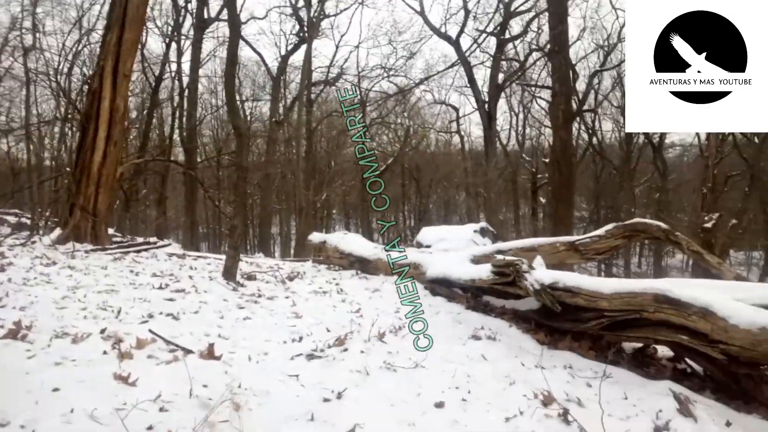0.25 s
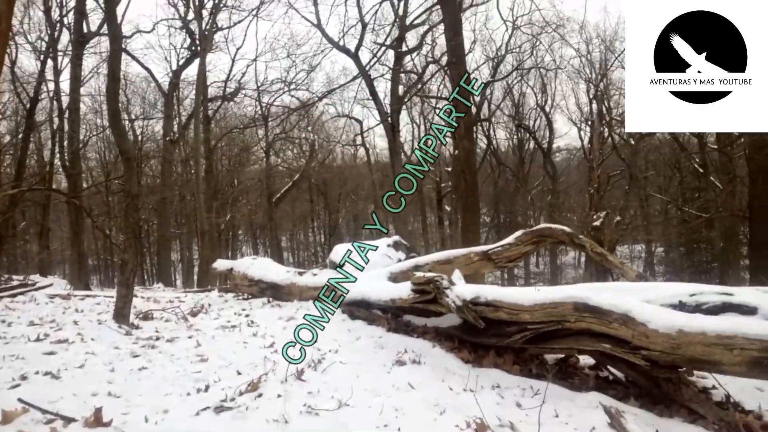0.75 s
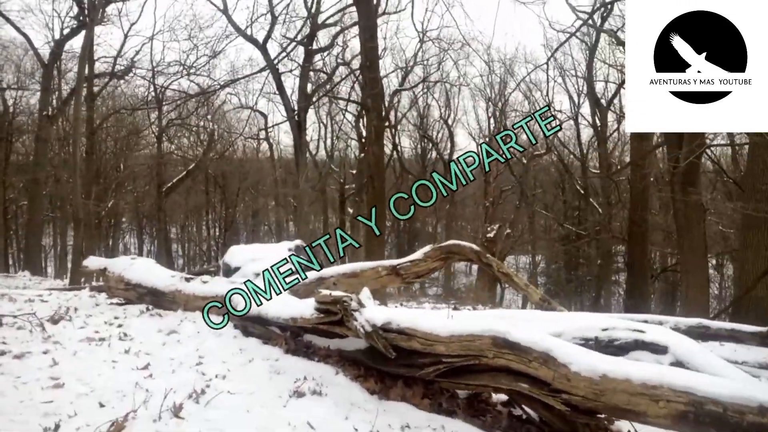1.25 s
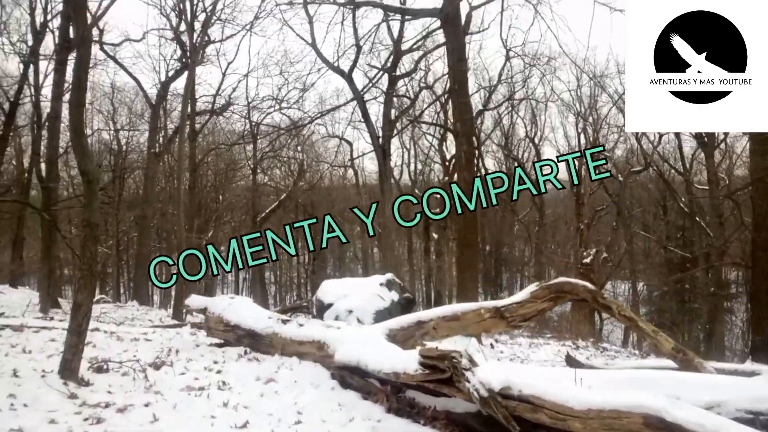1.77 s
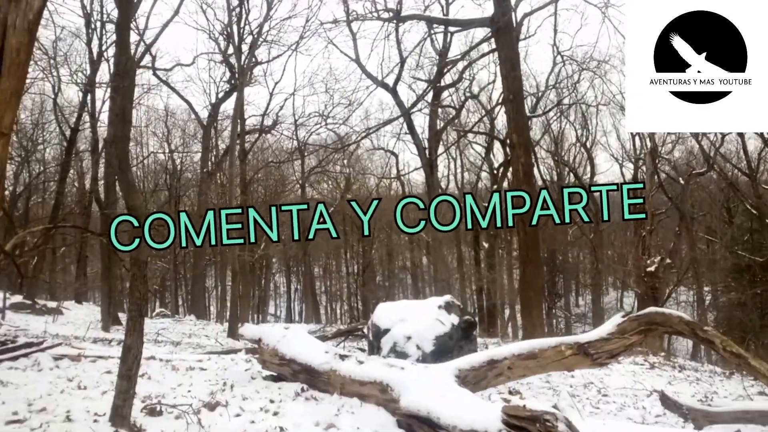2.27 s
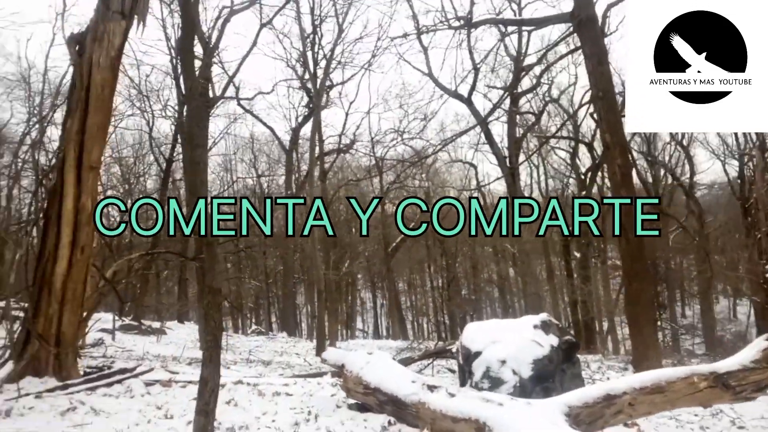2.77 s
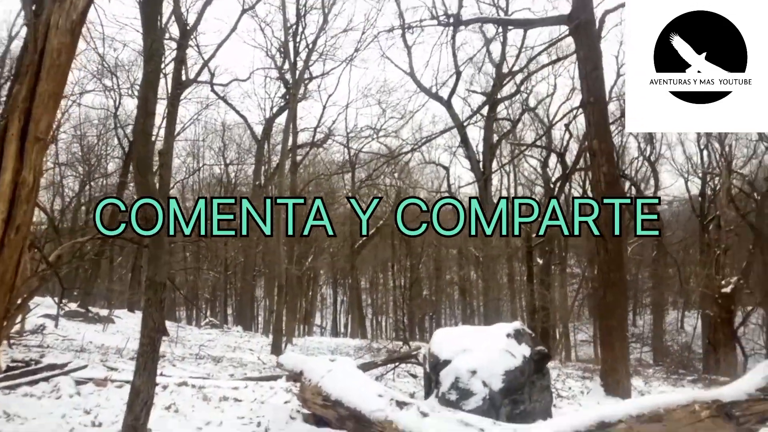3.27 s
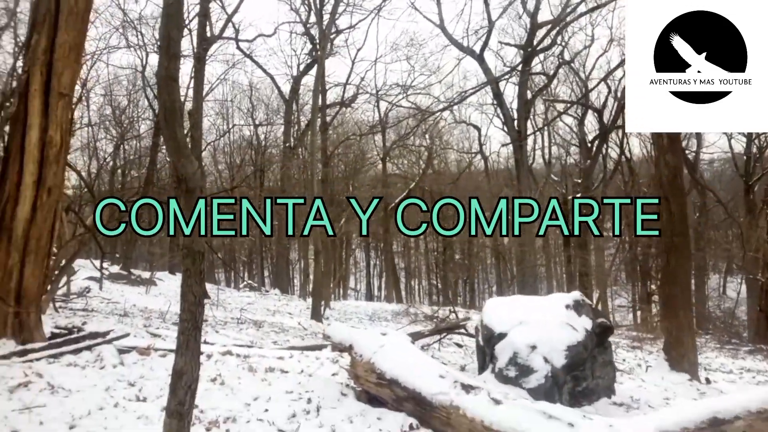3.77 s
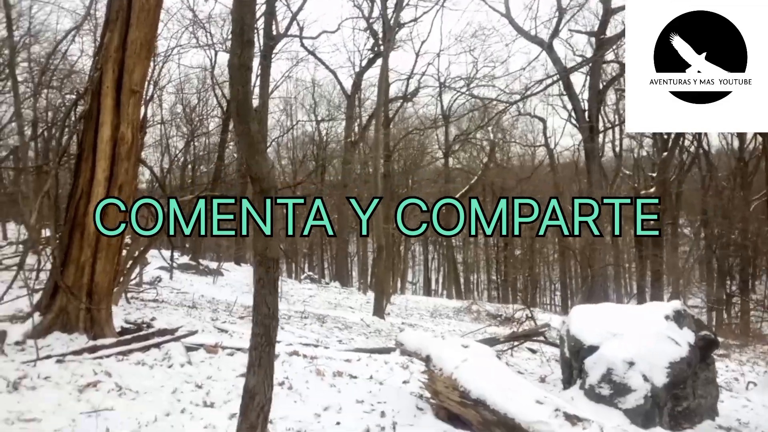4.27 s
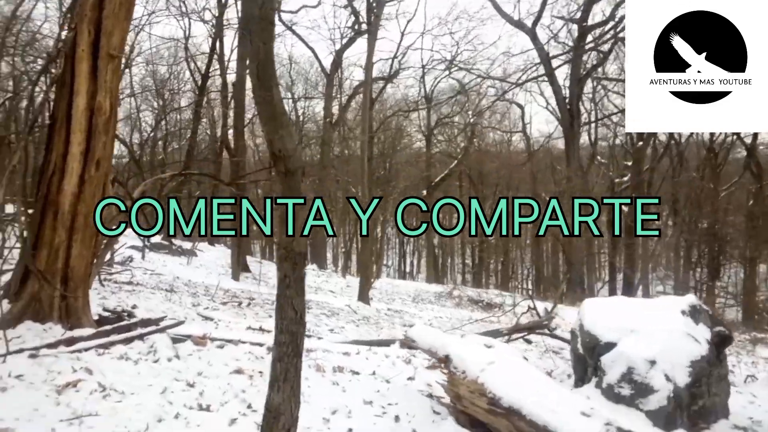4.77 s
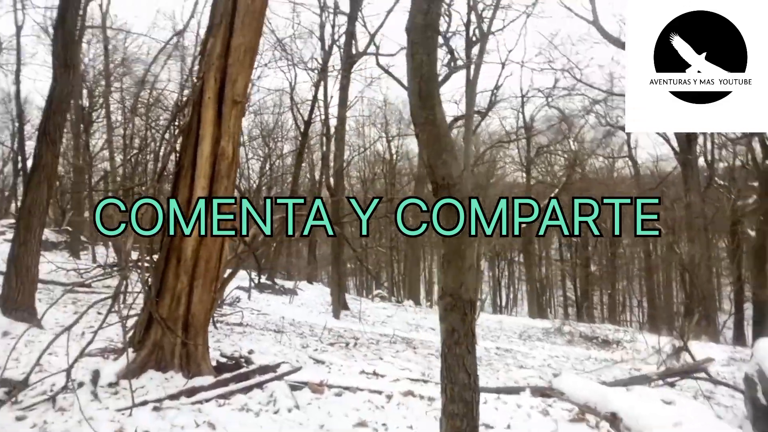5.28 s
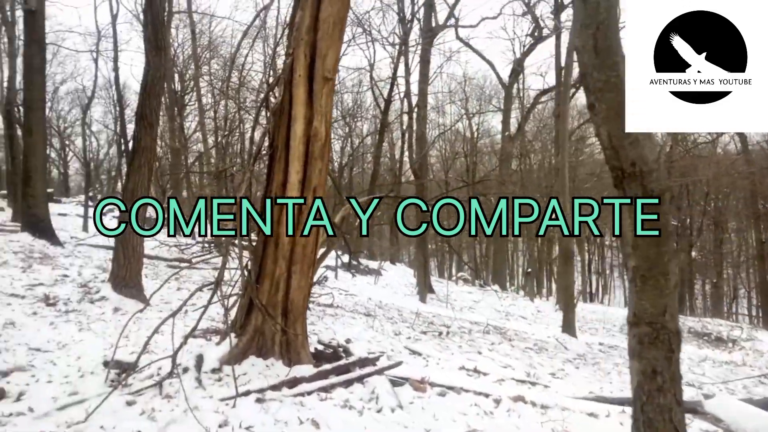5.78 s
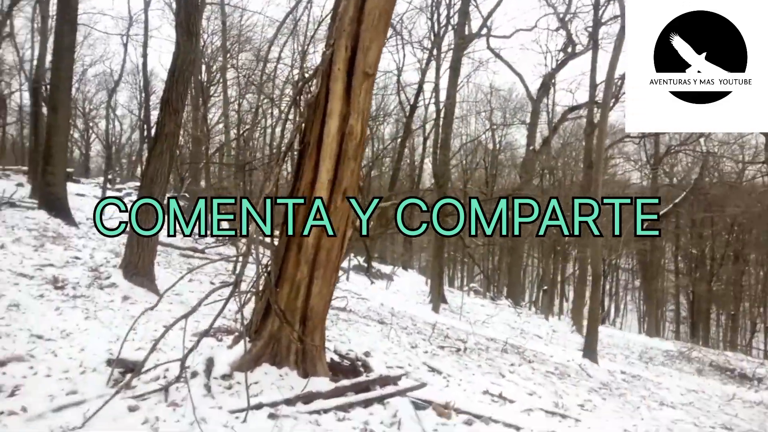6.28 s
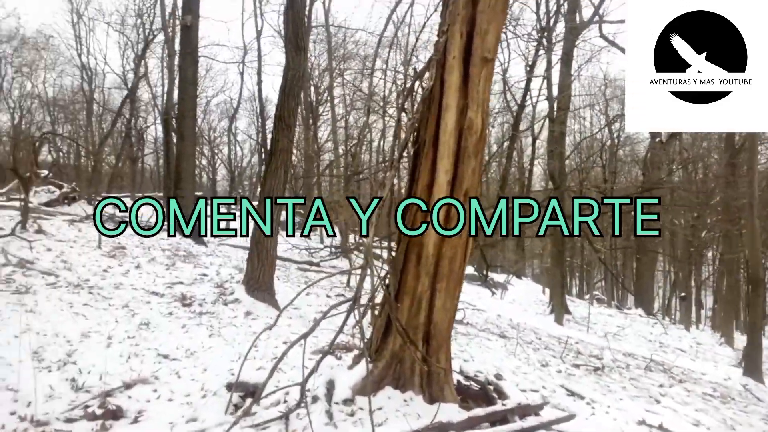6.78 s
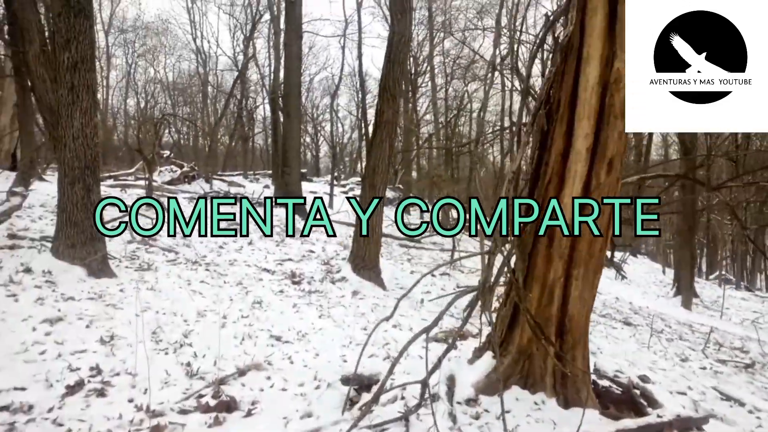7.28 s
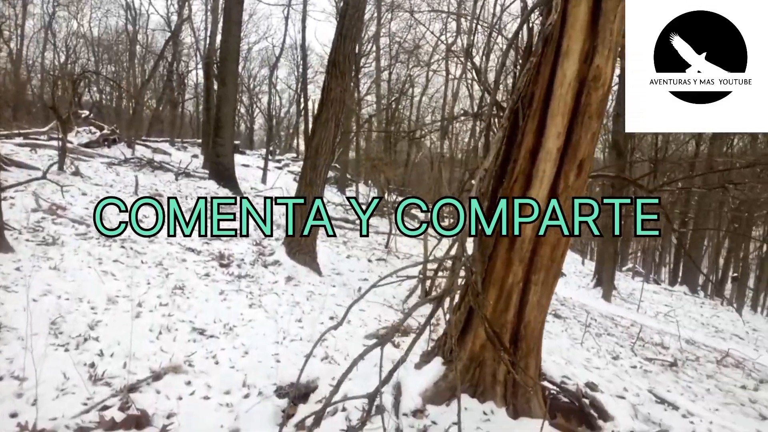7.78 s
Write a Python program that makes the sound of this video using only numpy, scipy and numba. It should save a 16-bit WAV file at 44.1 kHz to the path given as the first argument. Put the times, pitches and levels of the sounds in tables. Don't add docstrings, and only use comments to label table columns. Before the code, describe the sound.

A walker crosses crusted snow in a still, bare forest, holding the microphone in the hand. About every seven tenths of a second a boot bites, cracking the icy crust in a dense crackle, with crumbs hissing above and a dull crunch below. Small ticks and scuffs fill the gaps. The early steps are uneven, the later ones fuller and brighter. Soft grip rumble and faint air lie underneath.

```python
import sys
import numpy as np
from scipy import signal
from scipy.io import wavfile
from scipy.ndimage import uniform_filter1d, map_coordinates
from numba import njit

SR = 44100
rng = np.random.default_rng(int(sys.argv[2]) if len(sys.argv) > 2 else 0)


def volts_from_decibels(level):
    exponent = np.asarray(level, float) / 20
    return 10 ** exponent


def put_to_file(sound):
    columns = np.atleast_2d(sound).T
    safe = np.clip(columns, -1, 1)
    whole_steps = np.round(safe * 32767)
    wavfile.write(sys.argv[1], SR, whole_steps.astype(np.int16))


N = 354652

# [t/s of full bite, level/dB, rise/s, sinking/s, time until lift/s]
HEELS = [(0.0, -41, .012, .05, .23), (0.644, -34, .008, .04, .41), (1.659, -41, .01, .04, .25),
         (2.434, -45, .014, .165, .17), (3.064, -41, .025, .05, .265), (3.682, -27, .018, .03, .32),
         (4.398, -31, .022, .03, .39), (5.056, -26.5, .006, .065, .31), (5.836, -28, .018, .03, .36),
         (6.488, -39, .012, .06, .35), (7.214, -28, .012, .04, .335), (7.925, -26, .04, .05, .3)]
# [t/s, level/dB, rise/s, sinking/s, fall/s]
ROLLS = [(0.168, -36, 2.5, .004, -0.1648), (0.798, -21, 0.1478, .022, -0.0369),
         (0.898, -37, -0.0793, 0.043, 0.3518), (1.702, -37.5, 0.0734, 0.024, 0.1173),
         (2.504, -35.5, 0.1368, .01, 0.1095), (3.157, -28.5, 0.1859, .02, 0.1135),
         (3.265, -37.5, 0.5384, 0.008, -1.2518), (3.77, -26.5, -0.047, 0.13522, 0.1064),
         (4.432, -24, 0.2027, .01, 0.3035), (4.705, -43, 0.0581, .01, 0.0156),
         (5.19, -29.5, .5, 0.07723, 0.1412), (5.885, -23.5, 0.1807, .005, 0.0655),
         (5.968, -34.5, 0.4913, .15, 0.3408), (6.603, -24.5, 0.1787, 0.12568, 0.1726),
         (7.29, -26, 0.2683, .13, 0.2228), (8.02, -24.5, 0.4375, .03, 0.5448)]
# [t/s, level/dB, rise/s, dragging/s]
SCUFFS = [(0.306, -55, .01, .015), (0.53, -59, .015, .105), (0.645, -30, .004, .008),
          (0.788, -25, .004, .004), (0.803, -24, .004, .004), (1.095, -51, .04, .07),
          (1.27, -53, .012, .02), (1.5, -54, .008, .02), (1.545, -55, .008, .02), (1.58, -57, .008, .035),
          (1.77, -57, .03, .11), (2.28, -66, .05, .11), (2.66, -65, .02, .04), (2.94, -62, .02, .05),
          (3.03, -57, .03, .015), (3.465, -59, .02, .04), (3.645, -54, .05, .03), (4.258, -52, .012, .04),
          (4.314, -48, .02, .06), (4.66, -44, .03, .012), (4.698, -42, .012, .012),
          (4.862, -39, .015, .006), (4.98, -53, .025, .07), (5.58, -63, .01, .07), (5.665, -48, .006, .02),
          (5.705, -50, .006, .04), (5.77, -55, .05, .05), (6.335, -58, .02, .015), (6.38, -58, .03, .1),
          (7.035, -56, .025, .06), (7.11, -54, .04, .09), (7.8, -65, .03, .06), (7.864, -45, .012, .04)]
# [t/s, level/dB, rise/s, packing/s, fall/s]
SINKS = [(0.0, -48, .11, 0.1083, 0.6031), (0.792, -29, 0.0797, 0.01118, 0.0978),
         (1.712, -32.5, 0.1745, 0.008375, 0.0876), (2.436, -36, -0.0033, .06, 0.1278),
         (2.51, -30.5, 0.1705, 0.00728, 0.1338), (3.075, -36.5, 0.2971, 0.02804, 0.0559),
         (3.135, -34, 0.1138, 0.1622, 0.092), (3.698, -29.5, 0.0291, 0.12087, 0.2078),
         (4.442, -30, 0.1664, 0.01833, 0.0758), (5.06, -29, 0.0084, 0.2385, -0.0163),
         (5.855, -30, 0.053, 0.04216, 0.1513), (6.49, -42, 0.0221, 0.0495, 0.0678),
         (6.599, -31, 0.239, 0.17488, -0.06), (7.21, -29.5, 0.0706, 0.18494, 0.0413),
         (7.946, -28, 0.1332, 0.004246, -0.0545), (8.042, -28, 0.2428, .01, 1.4927)]
# [t/s, share of loose crumbs, level/dB, brightness of the crust, level/dB]
GROUND = [(0.1, -5.5, -2.5), (0.65, 4, 5.5), (0.8, -6, -3), (0.95, -12, -3), (1.1, -17.5, -1), (1.7, -9, 0),
          (2.5, -13.5, -6), (3.08, -10, -2.5), (3.25, -13, -0.5), (3.7, -12, 0.5), (3.9, -14, 1.5),
          (4.42, -9, 4.5), (4.7, -9, 3), (5.07, -15, -0.5), (5.2, -13, 2), (5.35, -14, 4), (5.6, -8, 8),
          (5.9, -6.5, 4.5), (6.1, -6.5, 4), (6.3, -8, -3.5), (6.55, -9.5, 1.5), (6.8, -10, 5.5),
          (7.22, -7.5, 5.5), (7.35, -11, 8.5), (7.5, -11, 5.5), (7.95, -10.5, 1.5)]
# [t/s, level/dB]
DEPTH = [(0.1, -3.5), (0.8, -0.5), (1.7, 1), (2.5, 0), (3.1, -1.5), (3.25, 0.5), (3.7, 1), (3.9, 4),
         (4.42, 3), (4.5, 7), (5.06, 1.5), (5.25, -0.5), (5.85, 1.5), (6.5, 0.5), (6.7, 2), (7.22, 1),
         (7.38, 3), (7.95, -1.5)]
# [f/Hz, level/dB]
CRUST_COLOUR = [(1050, -15), (1250, 7.5), (1500, 9), (2000, 2.5), (2900, 6.5), (3600, -0.5), (4200, -21)]
CRUMB_COLOUR = [(3600, 9.5), (4500, 10), (5500, -10.5), (6500, -1.5), (7500, 11)]
PACKING_COLOUR = [(105, -15.5), (200, -7), (330, 3.5), (500, -1.5), (750, 4), (1150, 5.5)]
# [t/s, peak level/dB, ring f/Hz, decay/s]
SNAPS = [(0.626, -19, 1375, 0.047), (0.6426, -12.5, 1265, 0.072), (0.734, -10.5, 2840, .035),
         (0.7531, -23, 1440, .035), (0.8734, -20, 1400, .028), (0.8998, -14.5, 1450, 0.012),
         (1.657, -38.5, 1914, 0.035), (1.6751, -16, 2668, 0.08), (2.441, -28.5, 1147, 0.11),
         (2.4632, -19.5, 1039, 0.024), (3.0642, -25.5, 1316, 0.023), (3.149, -10.5, 2568, 0.03),
         (3.262, -14.5, 1798, 0.00996), (3.678, -11.5, 1173, 0.0077), (3.6872, -9, 1257, 0.14),
         (4.3964, -10.5, 1432, 0.17), (4.4181, -14, 1720, 0.015), (4.5983, -17.5, 1438, 0.044),
         (4.6528, -19, 1557, 0.036), (4.693, -18, 1839, 0.024), (5.0973, -19.5, 1915, 0.034),
         (5.973, -11, 1255, 0.038), (6.0502, -20.5, 2969, 0.025), (6.4858, -30.5, 2594, 0.036),
         (6.5654, -19, 2130, 0.057), (7.1703, -21, 2785, 0.029), (7.4224, -21, 1384, 0.074),
         (7.863, -15, 3124, 0.0858), (7.9262, -4.5, 2662, 0.078)]
# [t/s, peak level/dB, ring f/Hz, fine spray level/dB, decay/s]
TICKS = [(0.2531, -52.5, 2043, -13, 0.0642), (0.3038, -38.5, 1712, -1.5, 0.05233),
         (0.3493, -51, 1319, -9, 0.0504), (0.3797, -57.5, 2502, -8.5, 0.055),
         (0.4177, -45, 2312, -6.5, 0.06996), (0.5245, -36.5, 2902, -12, 0.0651),
         (0.5362, -34.5, 1125, -10, 0.0731), (0.586, -36.5, 1259, -10, 0.086),
         (1.0958, -37.5, 1574, -13.5, 0.0653), (1.1481, -35.5, 3217, -14.5, 0.05954),
         (1.274, -40, 1403, -9, 0.0558), (1.42, -43, 2304, -10, 0.0741), (1.5023, -38, 2860, -14.5, 0.06),
         (1.5465, -38, 1924, -10.5, 0.06), (1.5766, -41.5, 2959, -11.5, 0.0762),
         (2.7243, -44, 1130, -10, 0.04834), (2.8991, -41.5, 1193, -15, 0.0614),
         (2.9356, -44, 1605, -10.5, 0.0618), (3.3024, -39.5, 1534, -10, 0.0463),
         (3.3204, -44.5, 1637, -12.5, 0.0509), (3.3942, -45.5, 1436, -17, 0.04366),
         (3.4599, -47, 1658, -12.5, 0.0492), (3.486, -40, 1909, -9, 0.07363),
         (3.5636, -35.5, 1731, -21.5, 0.0692), (3.6163, -45, 1157, -10, 0.04446),
         (4.2588, -41.5, 2488, -13.5, 0.0457), (4.31, -34.5, 1452, -14.5, 0.06394),
         (4.8553, -41, 1706, -6.5, 0.04344), (5.0011, -41.5, 2026, -13, 0.041),
         (5.0237, -40.5, 1653, -17, 0.07204), (5.4175, -58.5, 1115, -7, 0.05715),
         (5.453, -53, 3809, -8.5, 0.0498), (5.5758, -58, 3230, -9.5, 0.0411),
         (5.6668, -37.5, 2812, -13.5, 0.04427), (5.7043, -35, 1484, -15.5, 0.071),
         (6.163, -35.5, 2444, -7, 0.081), (6.3179, -45, 1380, -13, 0.0647),
         (6.9409, -55, 3258, -11, 0.0464), (6.9674, -54.5, 4425, -13.5, 0.0505),
         (7.1151, -31.5, 1715, -13, 0.04402)]
# [t/s, peak level/dB, ring f/Hz, cycles until 60 dB down]
CRACKS = [(0.094, -24, 2640, 13.5), (0.174, -20.5, 1220, 23), (0.643, -20.5, 1260, 3.5),
          (0.785, -23, 1100, 12), (0.786, -10.5, 1170, 13), (0.801, -11, 1940, 12.5),
          (0.872, -27, 1430, 12.5), (0.928, -25.5, 1500, 17), (1.655, -31.5, 1950, 10),
          (2.493, -29, 1360, 11.5), (3.262, -22.5, 1820, 11.5), (3.564, -29.5, 1730, 14),
          (3.704, -13, 1190, 15.5), (3.766, -12.5, 1530, 5.5), (4.056, -52.5, 2830, 13.5),
          (4.097, -60, 1160, 11.5), (4.396, -19.5, 1370, 8), (4.437, -17.5, 1700, 13),
          (4.584, -24.5, 1820, 18), (4.713, -28, 1720, 18.5), (5.023, -34, 2150, 18.5),
          (5.053, -18, 1630, 13.5), (5.097, -22, 1930, 14), (5.142, -13.5, 2690, 13),
          (5.194, -24, 1280, 10), (5.836, -20.5, 2900, 8), (5.876, -14, 1440, 12), (6.506, -29, 1700, 10.5),
          (6.595, -13.5, 3100, 10), (6.737, -19, 1320, 10.5), (7.17, -29.5, 2700, 14),
          (7.216, -20, 2220, 10.5), (7.24, -14.5, 1650, 10), (7.291, -17, 2610, 14),
          (7.337, -21.5, 1790, 9.5), (7.915, -19.5, 1820, 5.5), (7.993, -18, 2400, 12.5),
          (8.004, -9.5, 1650, 10)]
# [t/s, peak level/dB, ring f/Hz]
SLABS = [(0.762, -26.5, 448.4), (0.784, -17.5, 373.8), (1.684, -26, 755.3), (2.44, -37, 538.6),
         (2.497, -21, 703), (3.08, -24, 421), (3.133, -22, 353.3), (3.675, -19, 789), (4.394, -23, 771),
         (4.43, -25, 221.6), (5.063, -17, 697.5), (5.831, -45.5, 862.8), (6.49, -30, 313.3),
         (6.571, -35, 343), (7.209, -22, 391.4), (7.921, -19, 715)]
# [t/s, level/dB]
TRICKLE = [
    (0.3, -68),
    (1.5, -68),
    (2.1, -76),
    (3.4, -81.5),
    (4.1, -77),
    (5.5, -74.5),
    (7.0, -68.5),
    (7.7, -70.5),
]
# [f/Hz, level/dB]
TRICKLE_COLOUR = [(1500, 2), (3500, -2.5), (7000, -10)]
# [t/s, level/dB]
ECHOES = [
    (0.009, -35.5),
    (.029, -20.5),
]
# [t/s, level/dB, rise/s, shaking/s]
JOLTS = [(0.03, -53, 1.3746, 0.02582), (0.297, -55.5, -0.0513, 0.07852), (0.527, -40, -0.0974, 0.10714),
         (0.76, -52, 0.8325, 0.13765), (1.08, -51, 0.1507, 0.1031), (1.58, -52.5, 0.0771, .28),
         (1.8, -55, 0.3738, 0.0956), (2.043, -48.5, -0.0738, 0.0368), (2.424, -46.5, 0.1033, 0.13613),
         (2.981, -53, 0.2818, 0.00895), (3.223, -59, -0.5671, 0.1008), (3.74, -54.5, 0.2253, 0.14476),
         (5.256, -58, -0.1563, 0.0724), (5.85, -65.5, 0.5183, 0.1177), (6.48, -59.5, 0.267, 0.1914),
         (7.273, -59.5, 0.5672, 0.0857), (7.585, -60, -0.3853, 0.1039), (7.95, -54, 0.3532, .04)]
# [t/s, peak level/dB, f/Hz]
KNOCKS = [(0.5165, -20, 86.97), (0.5532, -24.5, 116.3), (2.036, -32, 65.23), (2.407, -33.5, 83.7),
          (0.83, -41, 135), (7.93, -33.5, 129.5), (7.59, -49.5, 92.97), (0.65, -42, 55), (0.79, -41, 58.04),
          (1.085, -44.5, 53.64), (1.165, -43.5, 53.95), (1.56, -41, 46.22), (1.8, -45.5, 69.8),
          (2.32, -43, 65)]
# [t/s, level/dB]
BREEZE = [(0, -63), (0.4, -68.5), (0.9, -63), (1.3, -64.5), (1.6, -55.5), (1.95, -60), (2.2, -68),
          (2.9, -66.5), (3.3, -68.5), (4, -76), (8.04, -78)]
# [t/s, length/s, f/Hz, level/dB]
HUMS = [
    (0.454, 0.0591, 327.2, -64.5),
    (3.904, 0.1905, 603.4, -65.5),
    (4.526, .06, 600, -51),
    (4.61, 0.05806, 713.1, -61.5),
    (4.751, 0.0648, 728.6, -62.5),
    (5.5, 0.1585, 502.8, -71),
    (7.027, .12, 716.7, -61.5),
    (7.569, 0.1189, 517.4, -61),
    (7.721, 0.1191, 430.4, -61),
    (7.766, 0.1477, 728.1, -65.5),
]
# [f/Hz, level/dB per Hz]
FOREST_COLOUR = [(15, -36), (25, -2.5), (86, -3.5), (323, -6), (401, -4.5), (590, -7), (911, -10.5),
                 (1220, -34), (1310, -17.5), (5570, -36.5), (6130, -32), (8000, -57), (10400, -90),
                 (17600, -120)]


def boots():
    crust_db, bright_db, crumbs_db, packing_db = underfoot()
    load = np.clip(volts_from_decibels(0.77 * (crust_db + 43.5)), .1, 1)
    free = load ** -.45
    slip_db = free * (0.79 * drift(4.5) + 2.066 * drift(200) + 0.7937 * drift(35))
    crust = fractures(CRUST_COLOUR, 14000 * load, 1.9, 10.0 * free, volts_from_decibels(slip_db),
                      patchy=0.16942, even_s=0.0073, bright_db=bright_db)
    crumbs = fractures(CRUMB_COLOUR, 8000 * load, 2.3, 5.0 * free, volts_from_decibels(0.76 * slip_db + 0.42 * drift(6.7)),
                       patchy=0.18, even_s=0.014)
    packing = fractures(PACKING_COLOUR, np.full(N, 900.), 3.05, np.full(N, 14.0), volts_from_decibels(0.45 * slip_db),
                        patchy=0.3044, even_s=0.0082, bright_db=in_time(DEPTH)[0])
    crust = passband(crust, 993.4, 7300, order=6)
    small_pieces = 1.1346 * passband(crust, 1330, 7400, order=4)
    crust = load * crust + (1 - load) * small_pieces
    crumbs = passband(crumbs, 2800, 6950.7)
    packing = passband(packing, 150, 900, order=3)
    pressure_gate = volts_from_decibels(2 * np.minimum(crust_db + 64, 0))
    ice = pressure_gate * (volts_from_decibels(crust_db - 0.4067) * crust + volts_from_decibels(crumbs_db + 0.5) * crumbs)
    detour = SR * 0.0013574 * volts_from_decibels(1.58 * drift(4.03))
    mirrored = map_coordinates(ice, [np.arange(N) - detour], order=3, mode="nearest")
    return ice + (.7 - 0.5857 * load) * mirrored + volts_from_decibels(packing_db - 1.5323) * packing


def underfoot():
    heel_fall_s, lift_s, scuff_fall_s = .07, .025, .025
    on_ground = [(s, 0, rise, stay, lift_s) for s, db, rise, hold, stay in HEELS]
    planted_db = presses(-59.5, (on_ground, 0))
    heels = [(*row[:4], heel_fall_s) for row in HEELS]
    scuffs = [(*row, scuff_fall_s) for row in SCUFFS]
    touch_db = presses(-76, (heels, 60), (scuffs, 20))
    roll_db = presses(-99, (ROLLS, 55.5)) + planted_db
    crust_db = 10 * np.log10(volts_from_decibels(2 * touch_db) + volts_from_decibels(2 * roll_db))
    lead = round(.008 * SR)
    planted_early_db = np.pad(planted_db, (0, lead), mode="edge")[lead:]
    sink_db = presses(-99, (SINKS, 77.5)) + planted_early_db
    packing_db = 10 * np.log10(volts_from_decibels(2 * -69) + volts_from_decibels(2 * sink_db))
    loose_db, bright_db = in_time(GROUND)
    crumble_s = 0.03
    r = np.exp(-1 / (crumble_s * SR))
    lagging_db = signal.lfilter([1 - r], [1, -r], crust_db - crust_db[0])
    fresh_db = np.maximum(crust_db - lagging_db - crust_db[0], 0)
    crumbs_db = 1.0982 * (crust_db + 30.5) - 30.5 + loose_db - 0.26 * fresh_db
    light_db = 0.042 * np.clip(-37.5 - crust_db, 0, 25)
    return crust_db, bright_db - 0.26 * fresh_db + light_db, crumbs_db, packing_db


def fractures(colour, per_s, spread_db, cycles, clump, patchy, even_s, bright_db=np.zeros(N)):
    starts = np.flatnonzero(rng.random(N) < per_s / SR)
    pitch_luck, size_luck, sign_luck = rng.random((N, 3))[starts].T
    place = np.abs((pitch_luck + patchy * drift(14.17)[starts]) % 2 - 1)
    low_hz, high_hz = colour[0][0], colour[-1][0]
    hz = low_hz * (high_hz / low_hz) ** place
    level_db = -spread_db * np.log(size_luck + 0.03) + at_hz(colour, hz)
    level_db = level_db + 2 * bright_db[starts] * (place - .5)
    evening = np.sqrt(np.max(per_s) / per_s[starts] / cycles[starts])
    sizes = volts_from_decibels(level_db) * np.sign(sign_luck - .5) * hz / 1000 * evening
    out = np.zeros(N)
    add(out, starts, sizes, 2 * np.pi * hz / SR, volts_from_decibels(-60 * hz / cycles[starts] / SR))
    out = rms_one(out)
    span = round(even_s * SR)
    work = uniform_filter1d(uniform_filter1d(out ** 2, span), span)
    return rms_one(clump * out / np.sqrt(work + 0.21))


def snaps():
    length = 6000
    out = np.zeros(N + length)
    t = np.arange(length) / SR
    plates = [(s, db - 11.0, hz, -14.5, t60) for s, db, hz, t60 in SNAPS]
    rows = np.array(plates + list(TICKS))
    splinters, spray = rng.standard_normal((2, len(rows), length))
    dying = volts_from_decibels(-60 * t / np.clip(rows[:, 4:], .004, .15)) * np.minimum(t / 0.00066, 1)
    forces = .2 * splinters * np.abs(splinters) * dying
    broad_bands = passband(forces, 1000, 2900)
    fine_bands = passband(spray * dying, 3800, 7300)
    for row, force, broad, fine in zip(rows, forces, broad_bands, fine_bands):
        s, peak_db, hz, spray_db, _ = row
        modes = ring(force, hz, 49.0 / hz)
        modes = modes + 0.99 * ring(force, 1.6 * hz % 6500, 10.0 / hz)
        modes = modes + 0.13 * ring(force, 2.6 * hz % 6000 + 900, 13.0 / hz)
        body = 0.33 * modes + 2.4 * broad
        start = round(s * SR)
        out[start:start + length] += volts_from_decibels(peak_db - 3.0) * (body / np.abs(body).max() + volts_from_decibels(spray_db) * fine)
    return passband(out[:N], 1020, 9000, order=3)


def cracks():
    s, peak_db, hz, cycles = np.transpose(CRACKS)
    starts = (s * SR).astype(np.int64) + 15
    clicks, rings = np.zeros(N), np.zeros(N)
    clicks[starts] = -volts_from_decibels(peak_db)
    fades = volts_from_decibels(-60 * hz / np.clip(cycles, 3, 40) / SR)
    add(rings, starts, -volts_from_decibels(peak_db - 2.0), 2 * np.pi * hz / SR, fades)
    return volts_from_decibels(3.5) * passband(clicks + 1e-18, 880, 4000) + passband(rings + 1e-18, 830, 4000)


def slabs():
    s, peak_db, hz = np.transpose(SLABS)
    out = np.zeros(N)
    fades = volts_from_decibels(-60 * hz / 23.0 / SR)
    add(out, (s * SR).astype(np.int64), volts_from_decibels(peak_db - 4.0), 2 * np.pi * hz / SR, fades)
    return passband(out, 130, 1000)


def trickle():
    level_db, = in_time(TRICKLE)
    fits = volts_from_decibels(1.6 * drift(25) + 2.5 * drift(5.2))
    bits = fractures(TRICKLE_COLOUR, np.full(N, 900.), 2.2, np.full(N, 12.0), fits, patchy=.4, even_s=.03)
    return volts_from_decibels(level_db) * bits


def hand():
    jolt_fall_s = .08
    level_db = presses(-69, ([(*row, jolt_fall_s) for row in JOLTS], 35))
    rumble = rms_one(passband(rng.standard_normal(N), 55, 99))
    out = volts_from_decibels(level_db + 1.5 * drift(3.4)) * rumble
    for s, peak_db, hz in KNOCKS:
        push, start = np.zeros(N), round(s * SR)
        push[start:start + 150] = np.hanning(150) / 75
        out += volts_from_decibels(peak_db) * ring(push, hz, 0.0755)
    return out


def breeze():
    level_db, = in_time(BREEZE)
    return volts_from_decibels(level_db - 5.0 + 2.4 * drift(9.0)) * rms_one(passband(rng.standard_normal(N), 28, 75))


def hums():
    out, t = np.zeros(N), np.arange(N) / SR
    for s, length_s, hz, level_db in HUMS:
        near = slice(max(round((s - .3) * SR), 0), round((s + .3) * SR))
        tone = ring(rng.standard_normal(N // 10), hz, 0.1)
        tone = rms_one(tone[-len(t[near]):])
        swell = np.exp(-(2 * (t[near] - s) / length_s) ** 2)
        out[near] += volts_from_decibels(level_db) * tone * swell
    return out


def forest():
    out, white = 0, rng.standard_normal((2, N))
    edges = 24 * 2 ** np.arange(0, 8.6, .5)
    for k, (low, high) in enumerate(zip(edges, edges[1:])):
        level_db = at_hz(FOREST_COLOUR, np.sqrt(low * high)) + 1.9 * drift(5.3)
        out = out + volts_from_decibels(level_db) * passband(white[k % 2], low, high)
    return volts_from_decibels(-61) * rms_one(out)


def presses(rest_db, *groups):
    t = np.arange(0, N + 32, 32) / SR
    power = volts_from_decibels(2 * rest_db)
    for rows, sag in groups:
        s, below_db, rise, hold, fall = np.abs(rows).T[..., None]
        down = 30 * np.maximum(s - t, 0) / rise + 30 * np.maximum(t - s - hold, 0) / fall
        push_db = -below_db - down - sag * np.clip(t - s, 0, hold)
        power = power + volts_from_decibels(2 * push_db).sum(axis=0)
    return np.interp(np.arange(N) / SR, t, 10 * np.log10(power))


@njit
def add(out, starts, sizes, turns, fades):
    for k in range(len(starts)):
        now, before = 0., -sizes[k] * np.sin(turns[k]) / fades[k]
        length = int(np.log(1000) / -np.log(fades[k]))
        for i in range(starts[k], min(len(out), starts[k] + length)):
            now, before = 2 * fades[k] * np.cos(turns[k]) * now - fades[k] ** 2 * before, now
            out[i] += now


def ring(clicks, hz, t60):
    r, w = volts_from_decibels(-60 / (t60 * SR)), 2 * np.pi * hz / SR
    return signal.lfilter([0, np.sin(w)], [1, -2 * r * np.cos(w), r * r], clicks + 1e-18)


def drift(rate):
    r = np.exp(-40 * np.pi * rate / SR)
    slow = signal.lfilter([1], [1, -2 * r, r * r], rng.standard_normal(N // 20 + 2002))[2000:]
    return np.interp(np.arange(N) / 20, np.arange(len(slow)), rms_one(slow))


def passband(x, low_hz, high_hz, order=2):
    return signal.sosfilt(signal.butter(order, [low_hz, high_hz], "band", fs=SR, output="sos"), x)


def at_hz(points, hz):
    point_hz, level_db = np.transpose(points)
    return np.interp(np.log(hz), np.log(point_hz), level_db)


def in_time(rows):
    s, *columns = np.transpose(rows)
    return [np.interp(np.arange(N) / SR, s, column) for column in columns]


def rms_one(x):
    return x / np.sqrt(np.mean(x ** 2) + 1e-20)


def scene():
    feet = boots() + snaps() + cracks() + slabs()
    dull = passband(feet, 450, 6500, order=1)
    echoes = sum(volts_from_decibels(level_db) * np.pad(dull, (round(s * SR), 0))[:N] for s, level_db in ECHOES)
    return (feet + echoes + trickle() + hand() + breeze() + hums() + forest())[None]


def low_pass(x):
    return signal.sosfilt(signal.butter(12, 8360, fs=SR, output="sos"), x)


def record(dry):
    x = signal.sosfilt(signal.butter(4, 41.44, "high", fs=SR, output="sos"), dry)
    x = signal.sosfilt(signal.butter(10, 7372.9, fs=SR, output="sos"), x)
    x = signal.sosfilt(signal.cheby2(12, 60, 9101.7, fs=SR, output="sos"), x)
    return low_pass(x)


dry = scene()
out = record(dry)
put_to_file(out)
```